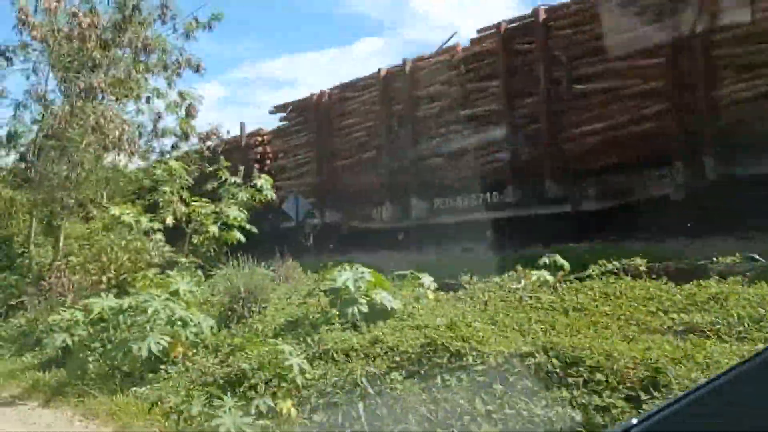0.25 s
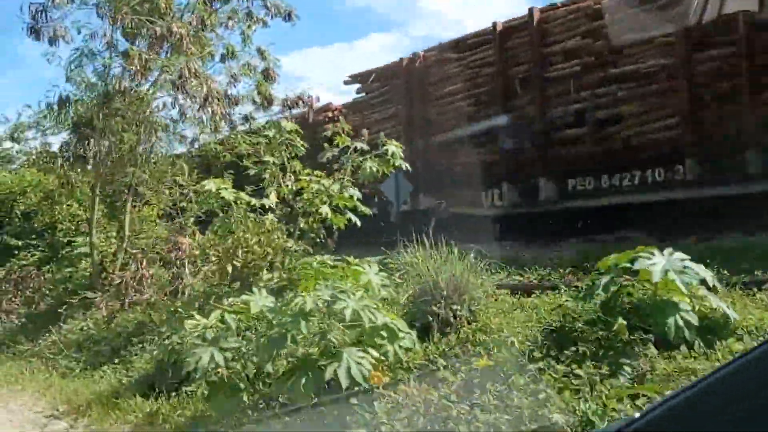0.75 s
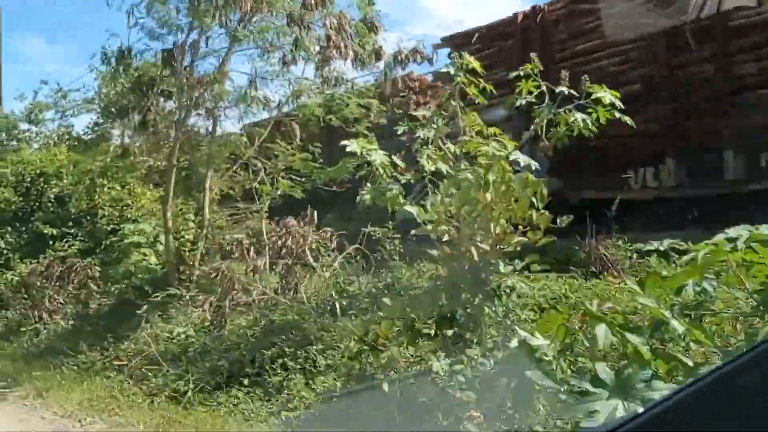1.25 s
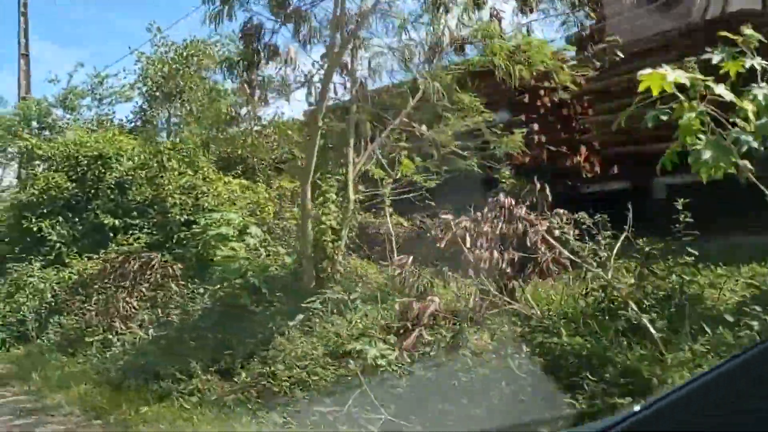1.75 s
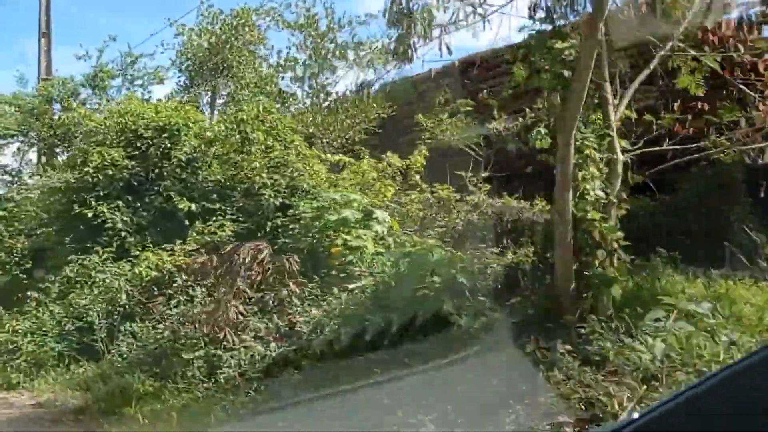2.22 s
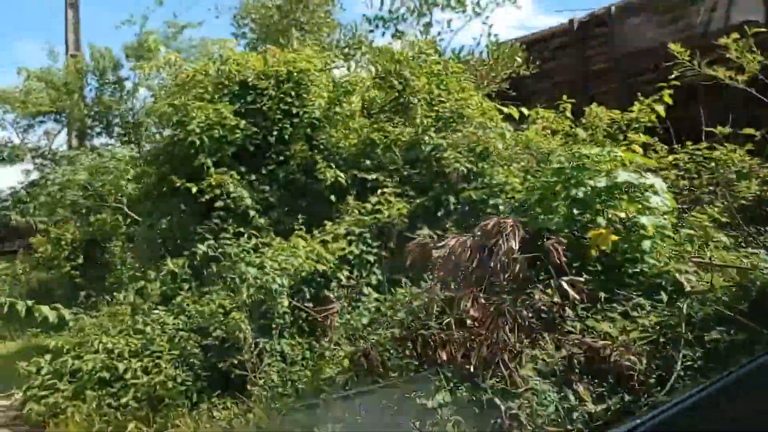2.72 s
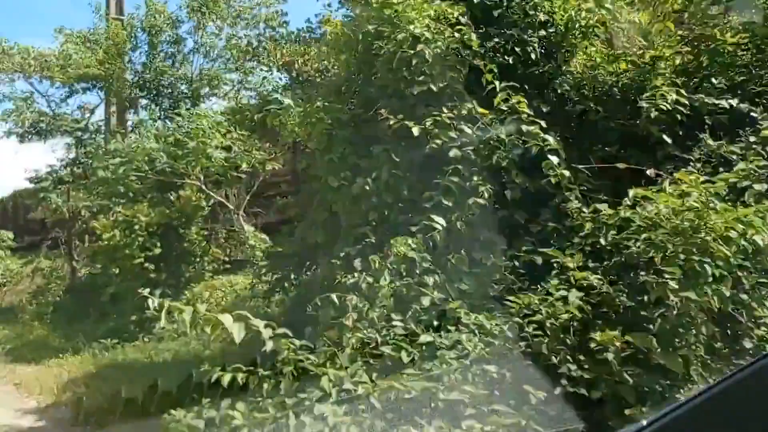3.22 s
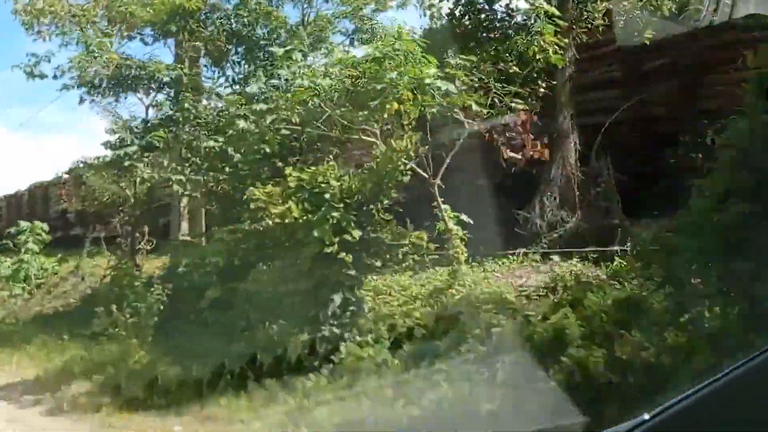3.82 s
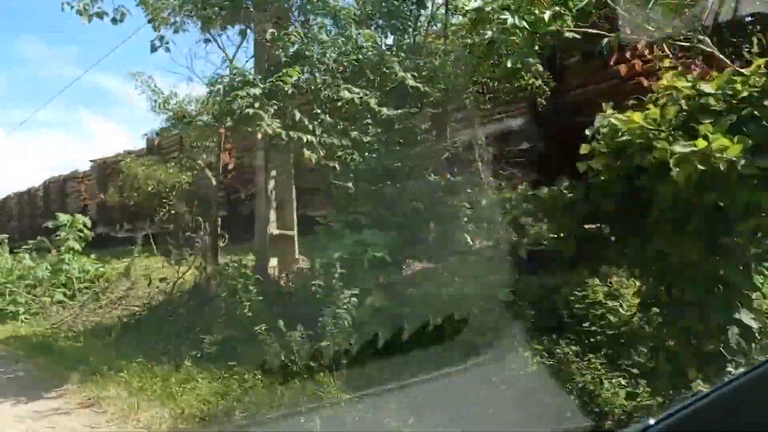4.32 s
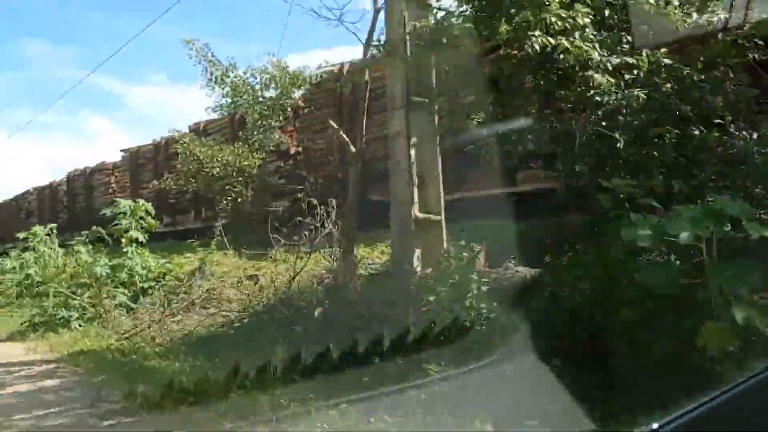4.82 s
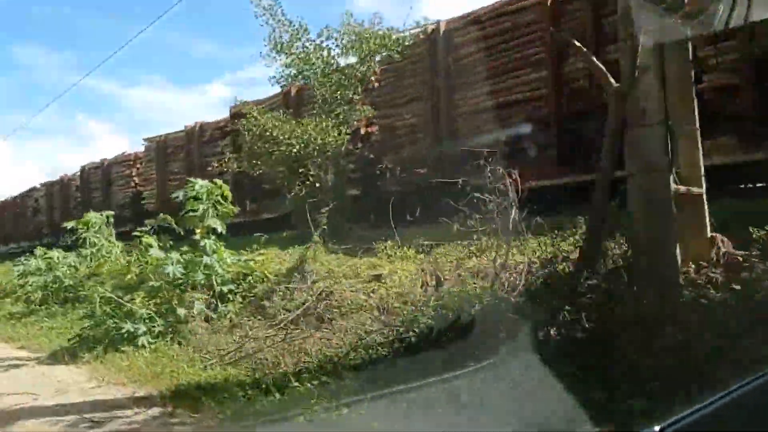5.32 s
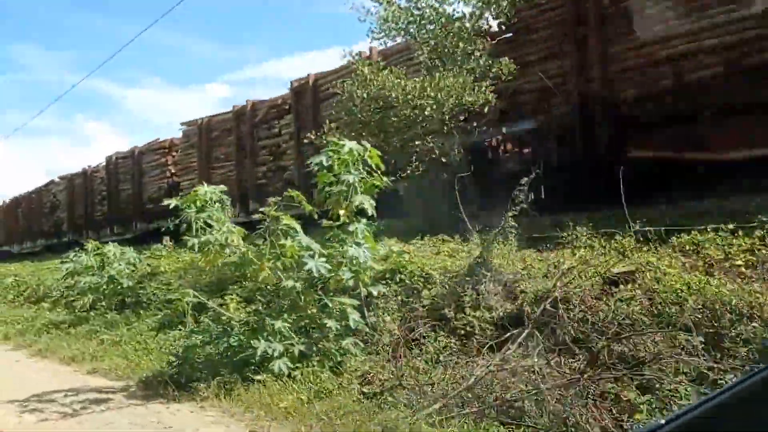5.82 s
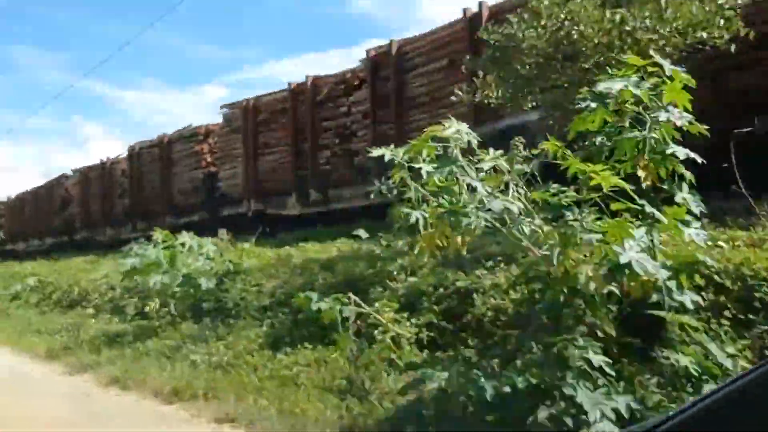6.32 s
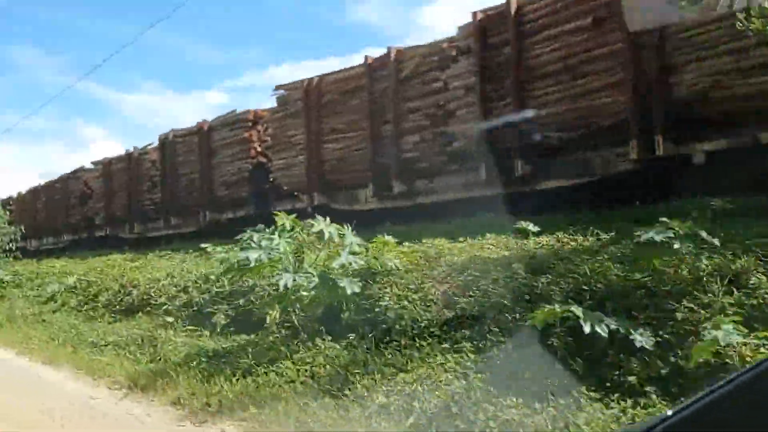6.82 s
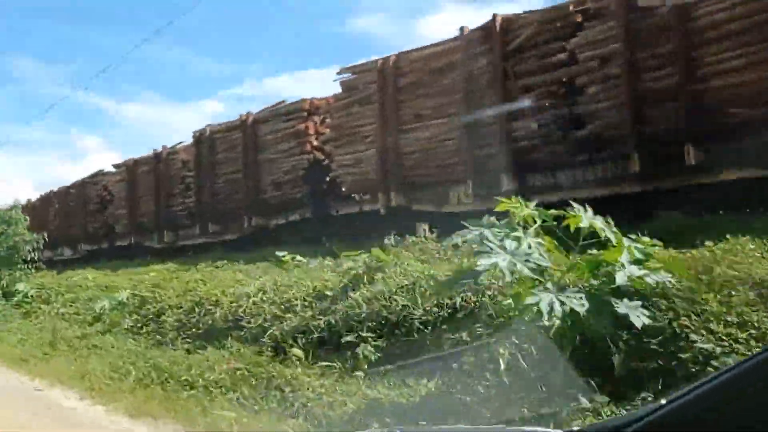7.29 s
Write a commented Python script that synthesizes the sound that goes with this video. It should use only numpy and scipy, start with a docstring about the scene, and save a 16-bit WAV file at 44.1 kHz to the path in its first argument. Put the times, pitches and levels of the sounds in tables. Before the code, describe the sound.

A close, boxy car interior: heavy low rumble swelling with each bump, a wavering engine note buried in it, and dull tyres crunching over dirt and stones. Small loose parts chatter and clatter, then quieten. A sharp, hollow crack with a quick bounce stands out near six seconds, followed by thin squeaking. Deep suspension thumps and a brief bright snap arrive as the road roughens again, all heard from inside the cabin.

```python
"""Inside a closed car rolling slowly along a rough dirt road.
Road shocks set cabin and body resonances booming, with a wavering engine note on the main cabin mode.
Filtered noise and stone pops make the tyres' dull roar, which eases off and builds up again.
Short noise bursts and ringing ticks make loose trim, grit, clunks, thumps and a snapping catch.
A hard object knocks and bounces twice; unsteady sines squeak and squeal thinly."""
import sys
import numpy as np
from scipy import signal
from scipy.fft import rfft, irfft, next_fast_len
from scipy.io import wavfile
from scipy.ndimage import uniform_filter1d

SR = 44100
rng = np.random.default_rng(int(sys.argv[2]) if len(sys.argv) > 2 else 0)


def output_pcm(signal):
    """Save a mono or channel-first signal as 16-bit PCM at the path in sys.argv[1].

    Samples are clipped to [-1, 1] before scaling.
    """
    pcm = np.clip(np.atleast_2d(signal).T, -1, 1) * 32767
    wavfile.write(sys.argv[1], SR, np.round(pcm).astype(np.int16))


N = 332955
TIME = np.arange(N) / SR

# spectrum of loose trim, shared by chatter, rattles and hiss: f/Hz, relative density/dB per Hz
TRIM_SPECTRUM = [(700, 7), (1500, 9), (2500, 5), (3300, 5.5), (3800, 0), (4500, 2), (5300, -2), (6700, 2),
                 (7400, -7), (8500, -29)]


def from_db(db):
    """Decibels to gain."""
    return 10 ** (np.asarray(db) / 20)


def rms_one(x):
    """Scale to unit power."""
    return x / np.sqrt(np.mean(x ** 2) + 1e-20)


def in_time(rows):
    """Each column of a curve, at every sample."""
    s, *columns = np.transpose(rows)
    return [np.interp(TIME, s, c) for c in columns]


def during(rows):
    """Gate that is open from the first to the last point of a curve."""
    return (TIME > rows[0][0]) & (TIME < rows[-1][0])


def drift(rate_hz):
    """Slow random wander of spread 1: low-passed noise, drawn at every 40th sample."""
    step, warm_up = 40, 2000
    r = np.exp(-2 * np.pi * rate_hz * step / SR)
    noise = rng.standard_normal(N // step + warm_up + 2)
    slow = signal.lfilter([1], [1, -2 * r, r * r], noise)[warm_up:]
    return np.interp(np.arange(N) / step, np.arange(len(slow)), rms_one(slow))


def random_signs():
    """A push or a pull for every sample."""
    return rng.choice([-1, 1], N)


def random_sizes(spread_db):
    """Impact strengths scattered in dB, with the extremes held back, and of either sign."""
    return from_db(spread_db * np.clip(rng.standard_normal(N), -2, 1)) * random_signs()


def butterworth(x, order, hz, kind="low"):
    """Low-pass or high-pass the sound."""
    return signal.sosfilt(signal.butter(order, hz, kind, fs=SR, output="sos"), x)


def colour(x, spectrum):
    """Causal (minimum-phase) filter with this spectrum; white noise keeps its power."""
    size = 2 * next_fast_len(N // 2 + SR // 10)
    hz, db = np.transpose(spectrum)
    log_hz = np.log(np.arange(size // 2 + 1) * SR / size + 1)
    # outside the listed range the spectrum falls away
    beyond = np.abs(log_hz - np.clip(log_hz, np.log(hz[0]), np.log(hz[-1])))
    gain = rms_one(from_db(np.interp(log_hz, np.log(hz), db) - 20 * beyond))
    # folding the cepstrum forward in time gives the minimum phase
    cepstrum = irfft(np.log(gain))
    fold = np.r_[1, np.full(size // 2 - 1, 2), 1, np.zeros(size // 2 - 1)]
    return irfft(rfft(x, size) * np.exp(rfft(cepstrum * fold)))[:N]


def shaken(modes, steady_s):
    """Resonances shaken by random road shocks, with swells longer than steady_s evened out; rms near 1."""
    out = 0
    for hz, width, db in modes:
        b, a = signal.iirpeak(hz, hz / width, fs=SR)
        shocks = rng.standard_normal(N + SR)
        resonance = signal.lfilter(b, a, signal.lfilter(b, a, shocks))
        out = out + from_db(db) * resonance[SR:]  # the first second only builds the ringing up
    span = int(steady_s * SR) + 1
    power = uniform_filter1d(uniform_filter1d(out ** 2, span), span)
    return out / np.sqrt(power + 1e-20)


def ring(clicks, hz, t60):
    """A unit click starts a dying sine whose envelope begins at 1."""
    r = from_db(-60 / (t60 * SR))
    w = 2 * np.pi * hz / SR
    return signal.lfilter([0, np.sin(w)], [1, -2 * r * np.cos(w), r * r], clicks + 1e-18)


def bursts(hits, t60, rise_s):
    """Each hit (t/s, level/dB) is a short dying noise; t60 is one for all or one per hit."""
    power = np.zeros(N + SR)
    age = np.arange(SR // 2) / SR
    for (s, db), dying_s in zip(hits, np.broadcast_to(t60, len(hits))):
        at = int(s * SR)
        envelope = from_db(db - 60 * age / dying_s) * (1 - np.exp(-age / rise_s))
        power[at:at + len(age)] += envelope ** 2
    return np.sqrt(power[:N]) * rng.standard_normal(N)


def bump_swells():
    """Each bump swells or dips the levels inside a shallow lull; dB added to boom, drone and roar."""
    # the wheels cross a bump: t/s, change of boom/dB, of panel drone/dB, of tyre roar/dB
    bumps = [(0.06, 2, 1.5, 2), (0.44, 1.5, 2.5, 0.5), (0.587, 10.5, 5.5, -2), (0.989, 2.5, 3, 4),
             (1.212, 10, -2.5, 1.5), (1.576, -4, 8.5, -0.5), (2.14, -24, 5, 2.5), (2.32, 3.5, 5, 2.5),
             (2.72, 9.5, -3.5, 0.5), (2.969, 0, 6.5, -0.5), (3.088, 5.5, -1.5, -1), (3.36, -3, 6.5, -2.5),
             (3.548, 0, 7.5, 0.5), (3.788, 11.5, -1.5, 1), (3.968, 2, 7.5, 0.5), (4.16, 6.5, -3.5, 1.5),
             (4.289, -16, 4.5, -3.5), (4.39, 13.5, -4, 1.5), (5.05, 2, -9.5, -0.5), (5.4, -11, 2.5, 1),
             (5.548, 2.5, 0.5, 1.5), (6.16, 8.5, 2.5, -1.5), (6.32, -1, 5.5, -2.5), (6.41, -8.5, -2.5, -3),
             (6.49, 4.5, 6, 0), (6.6, 2, 6.5, -1), (6.799, 8.5, 0, 3), (7.14, 6.5, 3, 5.5)]
    rise_s, fall_s = 0.037, 0.053
    # the springs unload round a bump: depth of the lull as a share of the change, and its reach
    lull_share, lull_s = 0.087, 0.086
    out = 0
    for s, *gains_db in bumps:
        age = TIME - s
        swell = np.exp(-(age / np.where(age < 0, rise_s, fall_s)) ** 2)
        lull = np.exp(-(age / lull_s) ** 2)
        out = out + np.outer(gains_db, (1 + lull_share) * swell - lull_share * lull)
    return out


def wander(depth_db):
    """Small unevenness of the road lets a level wander at wheel-hop pace, in dB."""
    return depth_db * np.clip(drift(rate_hz=8.8), -2, 2)


def hiss():
    """A faint steady noise with the colour of the trim."""
    return from_db(-82) * colour(rng.standard_normal(N), TRIM_SPECTRUM)


def body_heave(level_db):
    """The heavy body heaves on its springs and tyres: the lowest resonances."""
    # heave modes: f/Hz, width of each of two filter passes/Hz, relative gain/dB
    heave_modes = [(33, 3, -13.5), (50.3, 8.2, -8), (62.8, 20, -4)]
    return from_db(level_db) * shaken(heave_modes, steady_s=0.11)


def panel_drone(level_db):
    """Road shocks set the body panels droning at their own modes."""
    # panel modes: f/Hz, width of each of two filter passes/Hz, relative gain/dB
    panel_modes = [(123.4, 33.4, 1), (150.7, 36.2, 0.2), (194.3, 24.2, -7.5), (227.7, 55, -15)]
    return from_db(level_db) * shaken(panel_modes, steady_s=0.12)


def cabin_boom(level_db):
    """Road shocks make the enclosed air boom at its own modes."""
    # air modes of the cabin: f/Hz, width of each of two filter passes/Hz, relative gain/dB
    cabin_modes = [(84.6, 27, -5.5), (85.3, 13.2, 9)]
    return from_db(level_db) * shaken(cabin_modes, steady_s=0.13)


def engine(swell_db):
    """A wavering firing note that sits on the cabin's main mode and surges with it."""
    hz = 85.74 * (1 + 0.0201 * drift(3.07))
    note = rms_one(np.sin(2 * np.pi * np.cumsum(hz) / SR))
    return from_db(-36.5 + 0.31 * swell_db + 0.83 * drift(4.2)) * note


def tyres(roar_db, bright_db, lumpy_db, stones_per_s, stones_db):
    """Tread crushing dirt and popping over stones, dulled by the closed body."""
    # tyre roar: f/Hz, relative density/dB per Hz
    tyre_spectrum = [(150, -13.5), (270, 2), (360, 0.5), (450, -8), (540, -7), (680, -10), (830, -17),
                     (1080, -21), (1300, -24.5), (1800, -35.5), (2200, -48), (4000, -55), (8000, -60)]
    crush = from_db(lumpy_db * drift(24)) * rng.standard_normal(N)
    hit = rng.random(N) < stones_per_s / SR
    stones = hit * rng.uniform(0.54, 1, N) * random_signs()
    roar = colour(crush + from_db(stones_db) * rms_one(stones), tyre_spectrum)
    # bright_db lifts or lowers only what lies above a gentle split
    dull = butterworth(roar, 1, hz=890)
    return from_db(roar_db) * (dull + from_db(bright_db) * (roar - dull))


def pebbles(level_db, per_s, spread_db, t60, count=18):
    """Grit thrown up by the tyres pings on the underside: a random patter and a few clear hits."""
    # clear pings: t/s, f/Hz, initial level/dB
    clear_pings = [(4.927, 1777, -50), (5.042, 1790, -53), (5.288, 1036, -42.5), (5.59, 1605, -51.5),
                   (6.205, 1310, -52)]
    sizes = (rng.random(N) < per_s / SR) * random_sizes(spread_db)
    spot = rng.integers(0, count, N)
    patter = 0
    for k, hz in enumerate(np.geomspace(950, 2000, count)):
        patter = patter + ring(sizes * (spot == k) / hz, hz, t60)  # higher spots ring more weakly
    out = from_db(level_db) * rms_one(patter)
    for s, hz, db in clear_pings:
        click = from_db(db) * (np.arange(N) == int(s * SR))
        out = out + ring(click, hz, t60)
    return out


def stone_clunks():
    """Stones clunk under the floor: short bursts of mid-low noise."""
    # clunks: t/s, level/dB
    clunk_hits = [(0.073, -38), (0.2, -34), (0.315, -36), (0.706, -39.5), (0.802, -33), (0.989, -38.5),
                  (1.044, -32), (1.402, -29), (1.685, -39), (1.839, -41), (2.167, -35), (2.387, -37.5),
                  (2.655, -40.5), (2.916, -38.5), (3.165, -36), (3.26, -35.5), (3.656, -37.5),
                  (3.835, -34.5), (6.462, -34), (7.122, -29), (7.165, -35.5), (7.213, -38)]
    # sound of a clunk: f/Hz, relative density/dB per Hz
    stone_spectrum = [(200, -15), (350, 10), (560, 7), (750, 5), (920, 2), (1080, 4), (1400, -10.5),
                      (2000, -20), (4000, -31), (8000, -46)]
    return colour(bursts(clunk_hits, t60=0.074, rise_s=0.0013), stone_spectrum)


def suspension_thumps():
    """Deeper ruts thump the suspension: longer bursts of low noise."""
    # thumps: t/s, level/dB
    thump_hits = [(0.78, -28), (1.58, -31.5), (2.29, -33), (2.96, -27.5), (5.7, -30), (6.745, -23),
                  (6.79, -28), (7.1, -27.5)]
    # sound of a thump: f/Hz, relative density/dB per Hz
    thump_spectrum = [(150, -5.5), (225, 1), (300, -12.5), (380, -15), (600, -27.5), (1500, -47.5)]
    return colour(bursts(thump_hits, t60=0.35, rise_s=0.0024), thump_spectrum)


def chatter(shake_db, per_s, spread_db, clump_db, rub_db, count=64):
    """Small loose parts tick in quick clusters, at pitches of their own, over a gritty rubbing."""
    clumps = from_db(clump_db * np.clip(drift(45), -2, 1.5))
    # harder shaking brings more ticks, each one smaller before the level is set
    busy = from_db(np.clip(shake_db - np.median(shake_db), 0, 10))
    touch = rng.random(N) < per_s * busy * clumps / SR
    sizes = touch * random_sizes(spread_db) / np.sqrt(busy)
    part = rng.integers(0, count, N)
    pitches = np.linspace(1300, 7400, count) + rng.uniform(-40.5, 34, count)
    ticks = 0
    for k, hz in enumerate(pitches):
        ticks = ticks + ring(sizes * (part == k), hz, t60=.035)
    grit = rms_one(np.sqrt(clumps) * rng.standard_normal(N))
    rubbing = from_db(rub_db) * np.sqrt(busy) * grit
    return from_db(shake_db) * rms_one(colour(rms_one(ticks) + rubbing, TRIM_SPECTRUM))


def rattles(rise_s, grain_db, ring_s, count=8):
    """Quick dying runs of tiny contacts on several trim parts, each with brief resonances of its own."""
    # single rattles: t/s, level/dB, t60/s, lean (added to the treble, taken from the rest)/dB
    rattle_hits = [(0.068, -42.5, .055, 3), (0.428, -55.5, 0.14, 6), (0.5061, -48.5, 0.044, -11.5),
                   (0.5433, -40, .069, 2.5), (0.639, -49, 0.089, -2.5), (0.672, -49, 0.084, 2.5),
                   (0.7098, -47.5, 0.23, -0.5), (0.867, -38, 0.12, 0.5), (0.891, -45, 0.2, 2.5),
                   (0.907, -42.5, 0.095, 1.5), (0.982, -47, 0.11, 5.5), (1.044, -57, 0.13, -10.5),
                   (1.2, -53.5, 0.39, -2), (1.431, -59, 0.3, -7), (1.606, -52.5, 0.17, -1),
                   (1.75, -50.5, 0.091, 0.5), (2.0807, -47, .055, -1.5), (2.103, -48.5, .071, 0),
                   (2.374, -48.5, 0.38, -2), (2.485, -50.5, .1, 4), (2.553, -48.5, 0.036, -1),
                   (2.678, -46.5, 0.039, 3), (2.734, -52, 0.42, 1.5), (2.8027, -48.5, 0.15, 1.5),
                   (2.954, -47.5, 0.18, 1), (3.031, -38, .043, 3), (3.202, -43.5, 0.16, -2),
                   (3.261, -45, 0.087, 0.5), (3.332, -46, 0.036, 2), (3.375, -49.5, 0.067, 1),
                   (3.525, -52, 0.13, -1.5), (3.657, -49.5, .1, -1.5), (3.827, -38.5, 0.085, 3.5),
                   (3.94, -48.5, 0.12, -1.5), (4.174, -45, 0.083, -2), (4.3935, -49, 0.055, -2),
                   (4.504, -44, 0.027, 1.5), (4.685, -44.5, .045, -1.5), (5.604, -56, 0.07, -5),
                   (5.6917, -54.5, 0.052, 7.5), (5.782, -57.5, 0.044, 9), (6.5003, -53, 0.051, 5),
                   (6.799, -47.5, 0.16, 2), (6.921, -54, 0.093, -2), (7.172, -45.5, 0.11, 1.5),
                   (7.2105, -49.5, 0.078, 0.5), (7.316, -49.5, 0.11, 0)]
    split_hz = 4000  # where bright ticking takes over from dull clatter
    contacts = rms_one(from_db(grain_db * np.clip(drift(280), -2, 2)))
    age = np.arange(SR // 25) / SR
    out = 0
    for k in range(count):
        s, db, t60, lean_db = np.transpose(rattle_hits[k::count])
        run = 0
        for kind, sign in (("low", -1), ("high", 1)):
            noise = bursts(np.c_[s, db + sign * lean_db], t60, rise_s)
            run = run + butterworth(noise + 1e-18, 2, split_hz, kind)
        # a dying noise stands for the dense resonances of one part
        part = rng.standard_normal(len(age)) * from_db(-60 * age / ring_s)
        out = out + signal.oaconvolve(run * contacts, part / np.linalg.norm(part))[:N]
    return colour(out, TRIM_SPECTRUM)


def chirps(sharpness):
    """A loose part slips: a burst of friction in one narrow resonance; sharpness is pitch over width."""
    # chirps: t/s, f/Hz, level/dB, t60/s
    slips = [(5.383, 4400, -53.5, 0.049), (6.027, 6090, -45.5, 0.076)]
    out = 0
    for s, hz, db, t60 in slips:
        b, a = signal.iirpeak(hz, sharpness, fs=SR)
        friction = bursts([(s, db)], t60, rise_s=0.0013)
        make_up = np.sqrt(SR * sharpness / (np.pi * hz))  # for the power lost outside the narrow band
        out = out + make_up * signal.lfilter(b, a, friction)
    return out


def squeaks(waver, stutter_db):
    """Rubbing parts sing briefly on one unsteady pitch."""
    # thin squeaks, one curve each: t/s, f/Hz, level/dB
    squeak_curves = [
        [(5.5, 6930, -89), (5.85, 6880, -76), (6.12, 6900, -74.5), (6.42, 6820, -78)],
        [(6.005, 6150, -62), (6.028, 5920, -44), (6.036, 6250, -54), (6.05, 6350, -69)],
    ]
    out = 0
    for rows in squeak_curves:
        hz, db = in_time(rows)
        phase = 2 * np.pi * np.cumsum(hz * (1 + waver * drift(200))) / SR
        level = from_db(db + stutter_db * np.minimum(drift(40), 1))
        out = out + np.sqrt(2) * np.sin(phase) * level * during(rows)
    return out


def squeal(waver, stutter_db):
    """A longer, cleaner glide of three partials arches and sinks, faltering in level."""
    # the glide: t/s, f of the strongest partial/Hz, level/dB
    glide = [(6.295, 3030, -80), (6.32, 3120, -73), (6.38, 3270, -72), (6.42, 3270, -84.5),
             (6.46, 3310, -67), (6.53, 3270, -77), (6.585, 3180, -69), (6.65, 3110, -70), (6.69, 3075, -72),
             (6.8, 3040, -81)]
    hz, db = in_time(glide)
    half_phase = np.pi * np.cumsum(hz * (1 + waver * drift(90))) / SR
    octave_below = from_db(-3.5) * np.sin(half_phase)
    fifth_above = from_db(-14.5) * np.sin(3 * half_phase)
    tone = octave_below + np.sin(2 * half_phase) + fifth_above
    level = from_db(db + stutter_db * np.minimum(drift(30), 1))
    return np.sqrt(2) * tone * level * during(glide)


def catch_snaps():
    """A plastic catch snaps in two quick steps: very short bright bursts."""
    # steps of the snap: t/s, level/dB
    snap_hits = [(7.1632, -34), (7.1665, -29.5)]
    # sound of the catch: f/Hz, relative density/dB per Hz
    snap_spectrum = [(700, 0), (1200, 3.5), (2200, -8), (3000, 0.5), (5200, -0.5), (5950, 10), (6700, 0),
                     (7500, -6), (8300, -30)]
    return colour(bursts(snap_hits, t60=0.029, rise_s=0.0007), snap_spectrum)


def knocks(panel_db, thud_build_s):
    """A sharp crack, duller after the first contact, the object's ring, and a hollow panel's thud."""
    # the hard object lands and bounces: t/s, crack/dB, object ring/dB, panel thud/dB, top of the crack/Hz
    impacts = [(5.9591, -16, -18, -22.5, 12000), (5.9633, -26, -40, -18.5, 5000),
               (6.0214, -30.5, -42, -15, 5000), (6.0649, -34.5, -53, -23.5, 3500)]
    # ring of the object and, lowest, of the panel it lands on: f/Hz, relative level/dB, t60/s
    ring_modes = [(392, 1, .055), (517, -6, .04), (802, -11, .05), (1200, -15, .05), (2035, -13, .04),
                  (2266, 1, .034), (2423, -12, .035), (3248, -16, .04), (3457, -10, .03), (3796, -13, .03),
                  (4440, -2.5, .026), (5276, -9, .025), (5880, -13, .03), (6950, -15, .03)]
    # hard crack: f/Hz, relative density/dB per Hz
    crack_spectrum = [(130, -13.5), (230, 2.5), (350, 14.5), (520, 13.5), (700, -5.5), (950, 9.5),
                      (1300, -2), (1700, 3.5), (2400, -2.5), (3000, 1), (3800, -0.5), (4300, -3),
                      (5200, -6.5), (6900, -2), (7700, -24), (10000, -33.5)]
    # hollow panel: f/Hz, relative density/dB per Hz
    hollow_spectrum = [(180, -23.5), (380, 1.5), (600, 7.5), (1050, 6.5), (1400, -8.5), (2000, -9),
                       (4000, -33), (8000, -63)]
    s, crack_db, ring_db, thud_db, top_hz = np.transpose(impacts)
    cracks = 0
    for at, db, hz in zip(s, crack_db, top_hz):
        crack = bursts([(at, db)], t60=0.051, rise_s=0.0015)
        cracks = cracks + butterworth(crack + 1e-18, 2, hz)
    thuds = bursts(np.c_[s, (thud_db + crack_db) / 2 + panel_db], t60=0.12, rise_s=0.009)
    out = colour(cracks, crack_spectrum) + colour(thuds, hollow_spectrum)
    for hz, db, t60 in ring_modes:
        of_panel = hz < 700
        clicks = np.zeros(N)
        clicks[(s * SR).astype(int)] = from_db(db + (thud_db if of_panel else ring_db))
        out = out + ring(clicks, hz, t60)
        if of_panel:  # taking away a faster ring lets the mode build up gradually
            out = out - ring(clicks, hz, thud_build_s)
    return out


def reflections(x, t60, wet_db, count=12):
    """Glass and dashboard send back a few echoes within milliseconds; overall level is kept."""
    out = x.copy()
    for k, delay in enumerate(np.geomspace(.0011, .017, count)):
        lag = int(delay * SR)
        sign = (-1) ** (k // 2)
        out[lag:] += sign * from_db(wet_db - 60 * delay / t60) * x[:-lag]
    return out * np.std(x) / np.std(out)


def scene():
    """Mix rumble, tyres, loose parts, squeaks and knocks; rumble, roar and chatter follow the road."""
    # slow course of the rumble as the car speeds up and eases off: t/s, cabin boom/dB, panel drone/dB
    rumble_curve = [(0, -23.5, -27), (1, -25.5, -26.5), (1.75, -23.5, -25), (2.5, -22.5, -23),
                    (3.3, -22, -25), (4.1, -23.5, -26), (4.7, -23.5, -26.5), (5.3, -23.5, -32),
                    (5.9, -29, -28.5), (6.4, -30, -28.5), (6.9, -24, -31), (7.35, -26, -25.5),
                    (7.55, -32, -34)]
    # roughness of the road before bumps and wander: t/s, tyre roar/dB, trim chatter/dB
    road_curve = [(0, -40.5, -69.5), (0.2, -38.5, -57.5), (0.36, -42, -66), (0.6, -35, -58),
                  (0.83, -41, -62.5), (1.1, -37.5, -60.5), (1.6, -38.5, -62.5), (1.98, -39.5, -66.5),
                  (2.35, -39.5, -63.5), (3.1, -35.5, -61), (3.95, -38.5, -60), (4.35, -38, -66),
                  (4.85, -43, -74), (5.3, -43.5, -72), (5.65, -43.5, -69), (6.3, -41, -68.5),
                  (6.8, -42, -65), (7.2, -41.5, -63.5), (7.55, -44.5, -74)]
    boom_db, drone_db = in_time(rumble_curve)
    roar_db, shake_db = in_time(road_curve)
    boom_swell, drone_swell, roar_swell = bump_swells()
    uneven_db = wander(depth_db=-0.48)

    # the heavy body follows only the slow course, not the single bumps
    rumble = body_heave(drone_db - 8.0)
    rumble = rumble + panel_drone(drone_db + drone_swell + wander(depth_db=2.1))
    rumble = rumble + cabin_boom(boom_db + boom_swell + wander(depth_db=1.34))
    rumble = rumble + engine(boom_swell)

    # coarser ground brightens the roar by a share of the chatter's swing in dB
    bright_db = 0.17 * (shake_db - np.median(shake_db))
    road = tyres(roar_db + roar_swell + uneven_db, bright_db,
                 lumpy_db=1.55, stones_per_s=70, stones_db=-14.0)
    road = road + pebbles(roar_db - 24.0, per_s=56, spread_db=6.5, t60=.05)
    road = road + stone_clunks() + suspension_thumps()

    trim = chatter(shake_db + 1.3 * roar_swell + uneven_db,
                   per_s=780, spread_db=4.5, clump_db=5.5, rub_db=-0.5)
    trim = trim + rattles(rise_s=0.0015, grain_db=3.0, ring_s=0.012)
    trim = trim + chirps(sharpness=33) + catch_snaps()

    inside = reflections(hiss() + road + trim, t60=0.0056, wet_db=-26.5)
    thin = squeaks(waver=0.016, stutter_db=5.0) + squeal(waver=.011, stutter_db=5.5)
    return (rumble + inside + thin + knocks(panel_db=-12.0, thud_build_s=.012))[None]


def record(dry):
    """The top is cut steeply above 8100 Hz."""
    return butterworth(dry, 14, hz=8100)


dry = scene()
out = record(dry)
output_pcm(out)
```